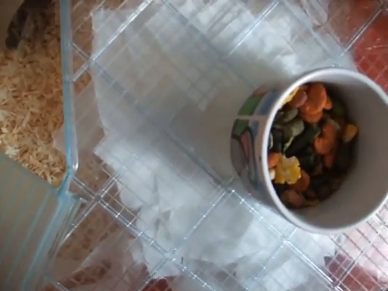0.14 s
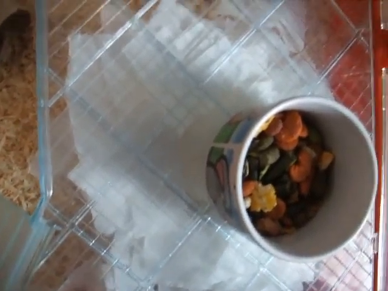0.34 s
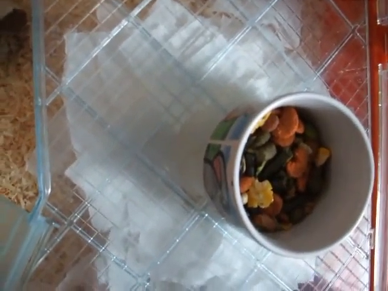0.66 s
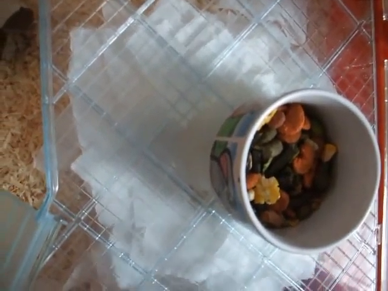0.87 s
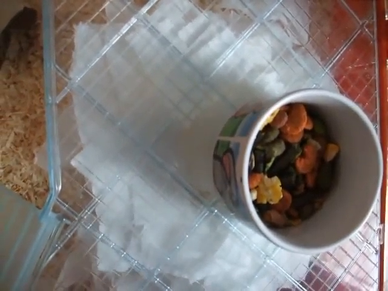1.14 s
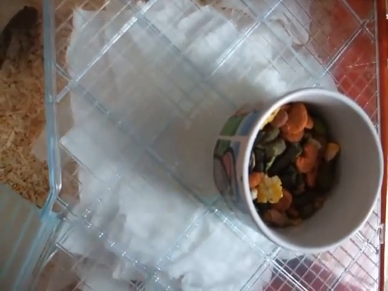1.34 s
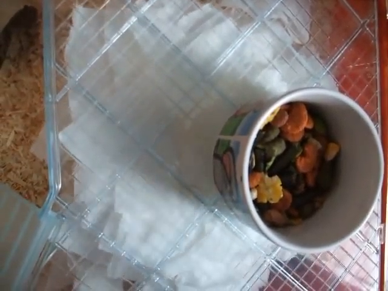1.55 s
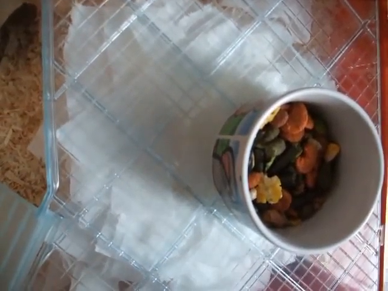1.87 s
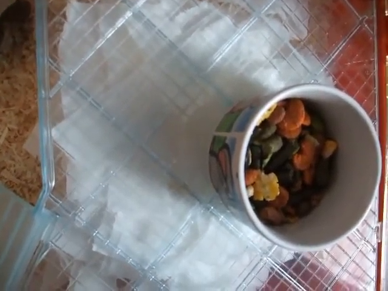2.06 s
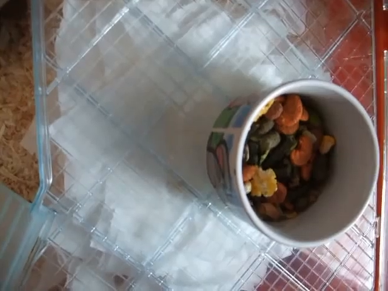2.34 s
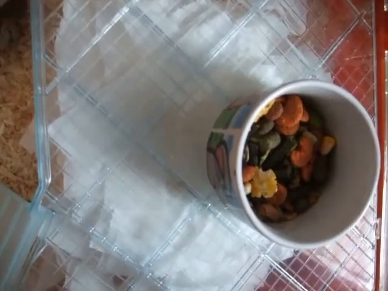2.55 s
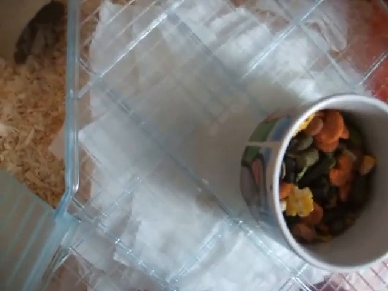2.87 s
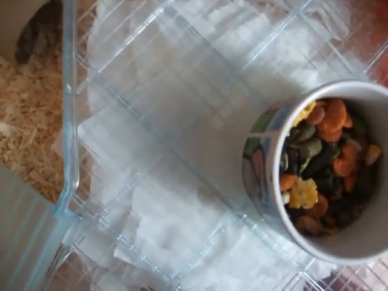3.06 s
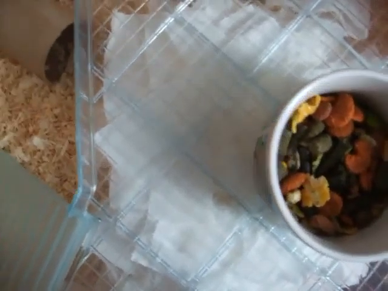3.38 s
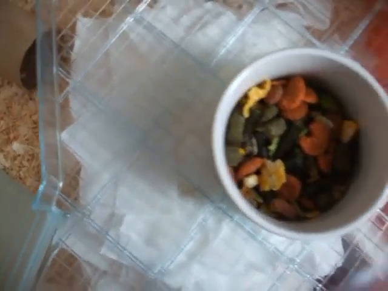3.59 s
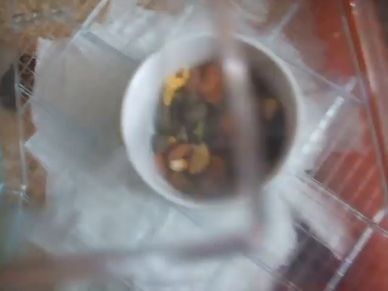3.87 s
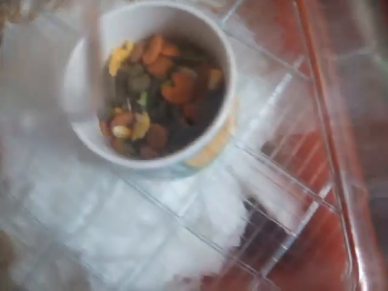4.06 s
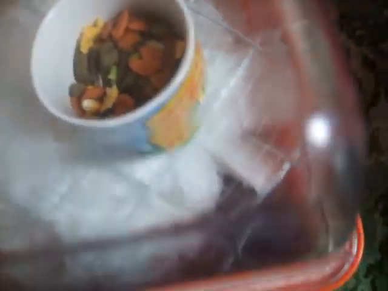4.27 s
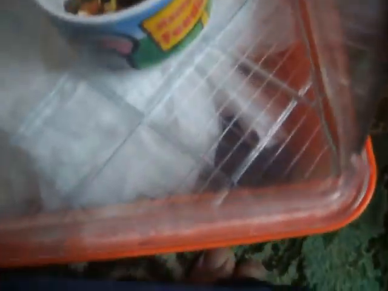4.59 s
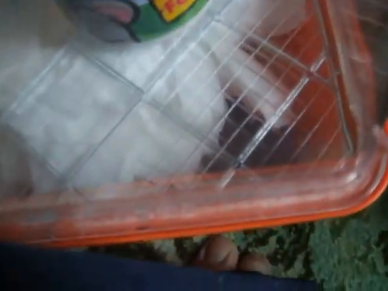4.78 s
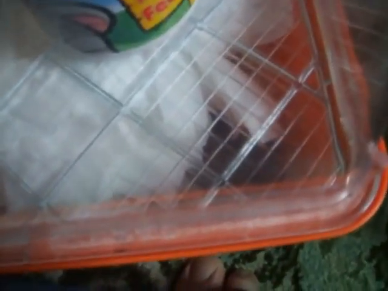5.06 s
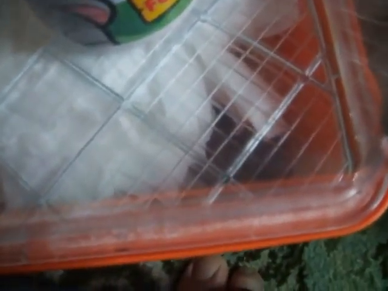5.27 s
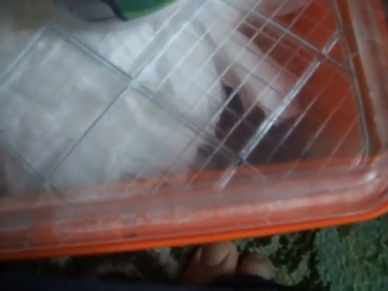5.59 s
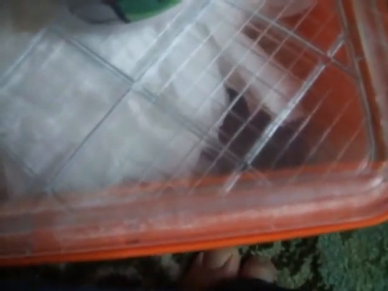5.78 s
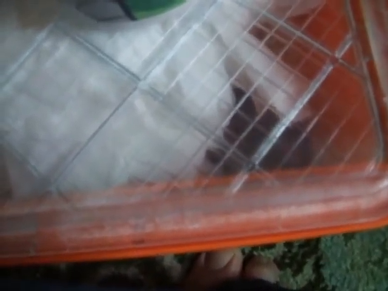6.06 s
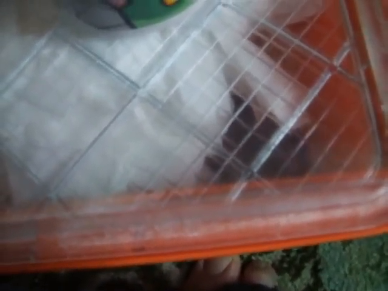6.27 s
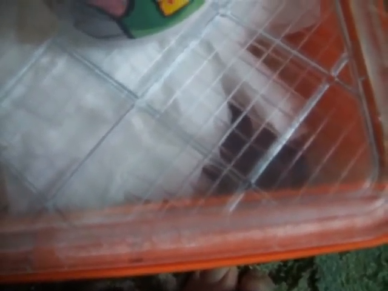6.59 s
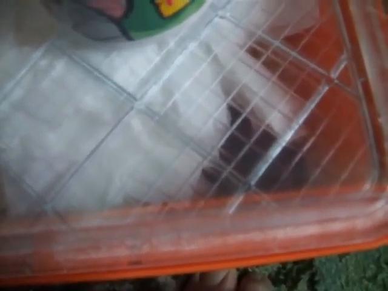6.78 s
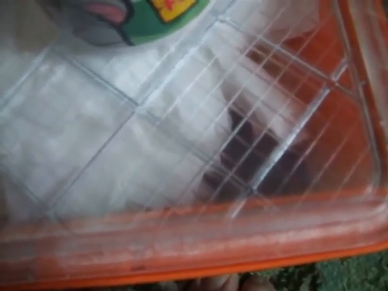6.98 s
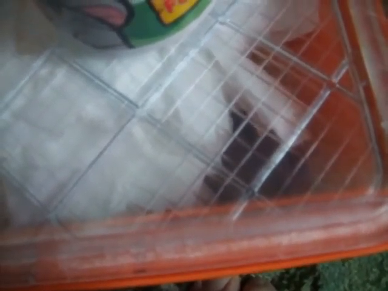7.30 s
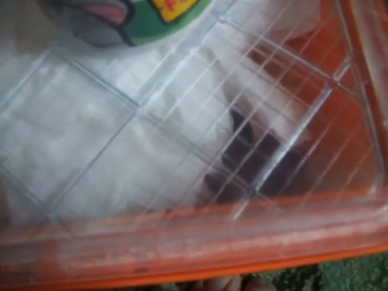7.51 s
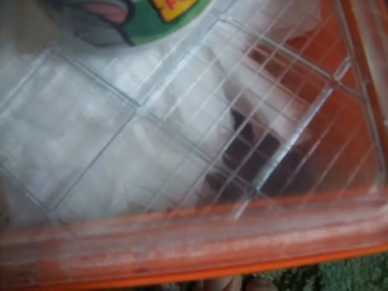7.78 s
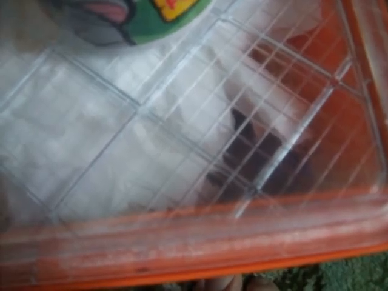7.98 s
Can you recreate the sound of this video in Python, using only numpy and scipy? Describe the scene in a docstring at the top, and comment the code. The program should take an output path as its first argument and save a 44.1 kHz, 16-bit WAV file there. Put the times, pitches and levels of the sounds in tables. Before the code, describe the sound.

A quiet indoor scene heard very close and dry through a narrow-band handheld microphone. A steady soft hiss runs throughout, with a faint thin whine and airy bands fluttering around 1 kHz. Tiny grip shifts open it; a light scuff and clicky thump come near 1.1 s. A heavy blunt thump hits at 2.05 s, softer ones around 2.6 s, with a sharp click at 2.86 s. Juddering low fumbles run from 2.9 to 3.3 s, strongest near 3.23 s. From 3.55 to 4.5 s plastic knocks and clicks crowd together, with very hard, clipped snaps at 3.76 and 3.97 s. A small snap at 4.74 s leads into a short, uneven creak from 4.78 to 4.92 s. Light taps follow near 5.05 and 5.53 s, weak ticks around 6.2 s, then mostly hiss until a faint double tap near 7.9 s, ending around 8.1 s.

```python
"""A quiet room, where a hand-held camera moves over a plastic hamster cage.
A steady coloured-noise hiss lies under it all, with fluttering narrow noise bands wavering near 1 kHz.
The grip slips in dull thumps, made of smooth pushes; contacts click by ringing the plastic's modes.
The plastic is scuffed (grainy noise), snaps (cracks of a few cycles) and creaks once (a panel sticks and slips).
A voice-band recorder ducks after loud hits and clips the hardest ones."""
import sys
import numpy as np
from scipy import signal
from scipy.fft import rfft, irfft
from scipy.io import wavfile
from scipy.ndimage import uniform_filter1d

SR = 44100
rng = np.random.default_rng(int(sys.argv[2]) if len(sys.argv) > 2 else 0)


def digitize_waveform(pressure):
    """Quantize a signal to 16-bit integers and store it at the path in sys.argv[1].

    Rows of a 2-D input are taken as channels; values are limited to [-1, 1].
    """
    field = np.atleast_2d(pressure).T
    bounded = np.clip(field, -1, 1)
    quanta = np.round(bounded * 32767).astype(np.int16)
    wavfile.write(sys.argv[1], SR, quanta)


N = 358974  # samples, about 8.14 s
TIME = np.arange(N) / SR
FREQS = np.fft.rfftfreq(N, 1 / SR)


def amp(db):
    """Decibels to gain."""
    return 10 ** (np.asarray(db) / 20)


def unit(x):
    """Scales to rms 1."""
    return x / np.sqrt(np.mean(x ** 2) + 1e-20)


def peaked(x):
    """Scales to peak 1."""
    return x / abs(x).max()


def curve(rows):
    """Joins (s, value) rows by straight lines."""
    return np.interp(TIME, *np.transpose(rows))


def add(mix, s, sound):
    """Mixes a sound in at time s."""
    part = mix[max(round(s * SR), 0):][:len(sound)]
    part += sound[:len(part)]


def noise(gain):
    """Noise of rms 1 with the given gain at each frequency."""
    white = rng.standard_normal(N)
    return unit(irfft(rfft(white) * gain, N))


def coloured(points):
    """Noise of rms 1 with a (Hz, dB) spectrum, joined by lines over log frequency."""
    hz, db = np.transpose(points)
    return noise(amp(np.interp(np.log(FREQS + 1), np.log(hz), db)))


def band(hz, width):
    """Noise of rms 1 in one resonance, width in Hz between its -3 dB points."""
    return noise(1 / (1 + ((FREQS - hz) / (0.78 * width)) ** 2))


def low_pass(x, hz, size):
    """Steep linear-phase low-pass."""
    taps = signal.firwin(size, hz, window=("kaiser", 9), fs=SR)
    return signal.oaconvolve(x, taps, "same")


def bass_cut(x, hz=130):
    """The microphone's third-order bass roll-off."""
    return signal.sosfilt(signal.butter(3, hz, "high", fs=SR, output="sos"), x)


def ring(modes, tilt_db, smear_db):
    """One blow on a set of decaying modes, then a brief smear of reflections inside the cage; peak 1."""
    t = np.arange(SR // 10) / SR
    hz, db, t60 = np.transpose(modes)[:, :, None]
    phase = 2 * np.pi * rng.random(hz.shape)  # each contact point starts the modes differently
    octaves = np.log2(hz / hz[0])
    decay = amp(db + tilt_db * octaves - 60 * t / t60)
    blow = (decay * np.sin(2 * np.pi * hz * t + phase)).sum(0)
    blow *= 1 - np.exp(-t / 0.00009)  # soften the onset
    echoes = rng.standard_normal(len(t)) * t * np.exp(-t / 0.0024)
    echoes /= np.linalg.norm(echoes)
    blow = blow + amp(smear_db) * signal.fftconvolve(blow, echoes)[:len(t)]
    return peaked(bass_cut(blow))


# Colour of the hiss. Each row: frequency in Hz, relative level in dB per Hz.
HISS_COLOUR = [(20, -6.5), (35, -4), (75, 4.5), (130, -7), (330, -6.5), (700, -7.5), (1300, -10),
               (1600, -7), (1850, -13.5), (2900, -12.5), (4200, -12.5), (5400, -14.5), (6500, -21.5)]
# Narrow bands in the hiss. Each row: centre in Hz, width in Hz, level in dB over the bowl,
# level in dB at the cage's edge (rms, before the hiss level curve).
HISS_BANDS = [(551.3, 68, -54.5, -55.5), (3284, 130, -57, -66.5), (2400, 550, -60.5, -52.5),
              (3550, 160, -65, -58)]
# Faint thin whine. Each row: frequency in Hz, level in dB (rms, before the hiss level curve).
WHINE_TONES = [(2008, -63.5), (3908, -67), (4000, -69)]
# How the whole hiss rises and falls as the camera turns. Each row: time in seconds, gain in dB.
HISS_GAIN = [(0, -0.5), (.9, -0.5), (1.5, -2), (2, .5), (2.3, -2), (3.5, 2), (4, 1.5), (5, -1), (7, -0.5),
             (8.14, -2)]


def hiss(base_db=-46):
    """Coloured noise whose narrow bands shift in level as the camera swings round, and a thin whine."""
    out = amp(base_db) * coloured(HISS_COLOUR)
    swing = curve([(3.6, 0), (4.5, 1)])  # 0 over the bowl, 1 at the cage's edge
    for hz, width, bowl_db, edge_db in HISS_BANDS:
        out += amp(bowl_db + swing * (edge_db - bowl_db)) * band(hz, width)
    for hz, db in WHINE_TONES:
        out += amp(db) * band(hz, width=26)
    return out * amp(curve(HISS_GAIN))


# Partials of the wavering band. Each row: centre in Hz, width in Hz, relative level in dB.
WAVER_PARTIALS = [(739, 150, -15), (843, 87, -13), (975, 72, -4.5), (1040.4, 52, -6.5), (1091, 110, -7.5),
                  (1360, 110, -15.5)]
# Overall level of the wavering band, before throb and swells. Each row: time in seconds, level in dB.
WAVER_LEVEL = [(0, -45), (.7, -41.5), (1.35, -45), (2, -43), (2.58, -44), (2.74, -57.5), (2.82, -41),
               (3.2, -41), (3.28, -50), (3.45, -42.5), (5.2, -44.5), (6.5, -43.5), (8.14, -45)]
# Its strongest brief swells. Each row: middle in seconds, rise in dB.
WAVER_SWELLS = [(0.409, 12.5), (1.048, 8.5), (3.131, 8.5), (6.528, 8)]
SWELL_S = 0.013  # time from the top of a swell down to about a third of its rise in dB


def waver(flutter_db=4, flutter_hz=24, throb_db=2.5, throb_hz=13):
    """Narrow bands near 1 kHz throb together at random, flutter apart, and now and then swell."""
    out = np.zeros(N)
    for hz, width, db in WAVER_PARTIALS:
        flutter = np.clip(noise(FREQS < flutter_hz), -2, 1.5)
        out += amp(db) * unit(band(hz, width) * amp(flutter_db * flutter))
    throb = np.minimum(noise((FREQS > 2) & (FREQS < throb_hz)), 1)
    swells = sum(db * np.exp(-((TIME - s) / SWELL_S) ** 2) for s, db in WAVER_SWELLS)
    return out * amp(curve(WAVER_LEVEL) + throb_db * throb + swells)


# Judders, in which the grip sticks and slips several times in a row. Each row: middle of the first push
# in seconds, middle of the last push in seconds, number of slips, first peak in dB, last peak in dB,
# middle bandwidth in Hz.
GRIP_JUDDERS = [(.01, 0.095, 4, -31, -33.5, 420), (1.9977, 2.022, 3, -21.5, -24, 205),
                (2.68, 2.702, 3, -30, -26, 150), (2.9345, 2.967, 3, -23.5, -17, 290),
                (2.9807, 3.0192, 5, -15.5, -28, 260), (3.0482, 3.0693, 3, -17, -28, 270),
                (3.2351, 3.279, 4, -6, -22.5, 600), (3.334, 3.348, 2, -29, -22.5, 190),
                (3.612, 3.708, 4, -13, -22.5, 560), (3.7855, 3.8047, 3, -22, -19, 720),
                (3.914, 3.931, 2, -24, -18.5, 620), (4.124, 4.1354, 2, -20.5, -27, 680),
                (4.1855, 4.1995, 2, -25, -23.5, 600), (4.257, 4.272, 2, -22.5, -28, 600),
                (4.394, 4.405, 2, -24, -21, 596), (5.5778, 5.639, 2, -27, -40, 650)]


def judders(uneven_oct=.08):
    """Evenly paced slips that grow or fade, each a little longer or shorter: (middle s, peak dB, bandwidth Hz)."""
    rows = []
    for first_s, last_s, slips, first_db, last_db, hz in GRIP_JUDDERS:
        for share in np.linspace(0, 1, int(round(slips))):
            s = first_s + share * (last_s - first_s)
            db = first_db + share * (last_db - first_db)
            rows.append((s, db, hz * 2 ** (uneven_oct * rng.standard_normal())))
    return rows


def faint_shifts(per_s=2.3, middle_db=-43.5, spread_db=7.5, middle_hz=600):
    """Barely felt shifts of the hand at random moments: rows of (middle s, peak dB, bandwidth Hz)."""
    draws = rng.random((80, 4))
    keep_chance = per_s * N / SR / len(draws)
    rows = []
    for chance, when, size, shortness in draws:
        if chance < keep_chance:
            db = middle_db + spread_db * (2 * size - 1)
            hz = middle_hz * 2 ** (2 * shortness - 1)  # up to an octave either way
            rows.append((when * N / SR, db, hz))
    return rows


# Single dull thumps of handling. Each row: middle of the push in seconds, peak in dB before the recorder,
# bandwidth in Hz (higher is a shorter push).
GRIP_THUMPS = [(0.3308, -34.5, 460), (1.171, -17, 278), (1.514, -34.5, 600), (1.837, -28, 620),
               (2.0522, 0.5, 660), (2.06, -9.5, 330), (2.4412, -30.5, 127), (2.6168, -18.5, 130),
               (2.6336, -8, 420), (2.86, -28.5, 500), (3.156, -27, 450), (3.2237, -3, 480),
               (3.298, -8.5, 650), (3.3084, -12, 470), (3.3253, -12, 550), (3.4445, -25.5, 132),
               (3.5548, -26.5, 130), (3.588, -16.5, 574), (3.7256, -20, 440), (3.7398, -14, 650),
               (3.7514, -21, 460), (4.0528, -31, 640), (4.4693, -28.5, 550), (5.0573, -10, 1150),
               (5.5342, -10, 1240), (6.1248, -34.5, 856), (7.6153, -36, 890), (7.9724, -26, 1000)]
# What the plastic rings with, also under the clicks. Each row: frequency in Hz,
# level in dB before the brightness tilt, t60 in seconds.
PLASTIC_MODES = [(229, -16, 0.039), (427, -11, .028), (760, -6.5, 0.02), (985, 1.5, 0.015),
                 (1220, -12, 0.0067), (1670, 4.5, 0.0088), (2237, -21, 0.00088), (2480, -16.5, 0.0014),
                 (2960, 3.5, 0.0056), (3633, 0, 0.0076), (4360, -9, 0.0029), (5100, -4, 0.0054),
                 (5545, -17, 0.0069)]


def thumps(ring_db=-36, body_hz=880):
    """Each grip slip is a smooth push, muffled by the camera body and swung by the bass cut; plastic rings faintly."""
    out, lead = np.zeros(N), SR // 200
    t = np.arange(-lead, SR // 25) / SR
    body = signal.butter(4, body_hz, fs=SR, output="sos")
    for s, db, hz in GRIP_THUMPS + judders() + faint_shifts():
        push = 1 / np.cosh(np.minimum(5.5 * hz * t, 50))  # the limit avoids overflow
        swing = peaked(bass_cut(signal.sosfilt(body, push)))
        add(out, s - lead / SR, -amp(db) * swing)
        add(out, s, amp(db + ring_db) * ring(PLASTIC_MODES, tilt_db=1.5, smear_db=-28.5))
    return out


# Clicks on the plastic. Each row: start in seconds, peak in dB before the recorder,
# brightness in dB per octave.
PLASTIC_CLICKS = [(0.927, -24.5, 13), (1.1603, -16, 10), (2.0515, -21.5, -0.5), (2.86, -13.5, 3.5),
                  (2.895, -25, 13), (3.570, -26, 13), (3.6136, -17.5, -6), (3.714, -21.5, 13),
                  (3.7623, -12, -6.5), (3.765, -4, 5.5), (3.775, -9.5, -1.5), (3.9238, -16, -7.5),
                  (3.9735, -5.5, 3.5), (4.0213, -7, 0), (4.0788, -16, -2.5), (4.111, -11, -1),
                  (4.1497, -10, -1.5), (4.170, -12.5, -3.5), (4.2373, -15.5, -3), (4.4705, -15.5, -0.5),
                  (4.594, -23, 4), (4.7381, -17, 4.5), (4.903, -19.5, -3), (4.9735, -24.5, -1),
                  (5.006, -19.5, -5.5), (5.0348, -24.5, 4), (5.0577, -24, -8.5), (5.5339, -13.5, -9.5),
                  (6.178, -24, -4), (6.2184, -22, -0.5), (7.879, -23.5, -2), (7.972, -23, -6.5)]


def clicks():
    """Hard little contacts ring the plastic for a few milliseconds."""
    out = np.zeros(N)
    for s, db, tilt_db in PLASTIC_CLICKS:
        add(out, s, amp(db) * ring(PLASTIC_MODES, tilt_db, smear_db=-13.5))
    return out


# Short dry scuffs. Each row: middle in seconds, length in seconds, level in dB at the top of the swell.
DRY_SCUFFS = [(1.06, 0.063, -36.5), (1.155, 0.012, -38.5), (2.896, 0.038, -42), (3.732, 0.093, -40.5),
              (4.733, 0.019, -37), (4.962, .02, -42.5), (5.032, 0.011, -43.5), (5.201, 0.026, -39.5)]
# Colour of the friction noise. Each row: frequency in Hz, relative level in dB.
FRICTION_COLOUR = [(1200, -29), (2000, -10), (2600, -4), (3400, -3), (4300, -3), (5400, -15)]


def scuffs(grain_db=3):
    """Brief swells of friction noise, made grainy by a fast random level."""
    swells = np.zeros(N)
    for s, length, db in DRY_SCUFFS:
        add(swells, s - length / 2, amp(db) * signal.windows.tukey(int(length * SR), .7))
    grain = unit(uniform_filter1d(rng.standard_normal(N), size=90))
    return swells * unit(coloured(FRICTION_COLOUR) * amp(grain_db * grain))


# Sharp snaps of the plastic, which do not ring. Each row: middle of the crack in seconds, crack level in dB,
# crack frequency in Hz, crack length in seconds, level in dB of the air shoved at the microphone.
PLASTIC_SNAPS = [(3.7649, 5, 3896, 0.0002, -39), (3.9739, 5, 4310, 0.00029, 4.5),
                 (4.7393, -19, 3280, 0.00086, -48)]


def snaps(shove_length=0.00031):
    """A crack of a few cycles, and from its middle on a one-sided shove of air."""
    out, lead = np.zeros(N), SR // 500
    t = np.arange(SR // 50) / SR
    for s, db, hz, length, shove_db in PLASTIC_SNAPS:
        burst = np.exp(-((t - lead / SR) / length) ** 2)
        add(out, s - lead / SR, amp(db) * burst * np.sin(2 * np.pi * hz * t))
        add(out, s, amp(shove_db) * peaked(t * np.exp(-t / shove_length)))
    return out


# Slips of the one creak. Each row: start in seconds, peak in dB before the recorder.
CREAK_SLIPS = [(4.781, -13.5), (4.79, -26), (4.8074, -22), (4.82, -24), (4.84, -17), (4.856, -18.5),
               (4.915, -12.5)]
# What the creaking panel rings with. Each row: frequency in Hz, level in dB before the tilt, t60 in seconds.
PANEL_MODES = [(160, -4, 0.064), (230, 0, 0.06), (421, 1.5, 0.032), (576, -7, 0.064), (804, 1, 0.064),
               (1058, 1.5, 0.028), (1154, -0.5, 0.029), (1610, -5.5, 0.049), (1737, 3, 0.037),
               (2140, -2, 0.027), (2226, -3, 0.024), (3280, -10.5, 0.016)]
REBOUND_S, REBOUND_DB = 0.00301, -11  # every slip catches once more, a moment later and softer


def creak(chatter_db=-31, count=28):
    """A panel sticks and slips unevenly, ringing at each slip and rebound; tiny slips chatter on just after."""
    out = np.zeros(N)
    for s, db in CREAK_SLIPS:
        for delay, drop_db in ((0, 0), (REBOUND_S, REBOUND_DB)):
            add(out, s + delay, amp(db + drop_db) * ring(PANEL_MODES, tilt_db=-1.1, smear_db=-7.5))
    for k, delay in enumerate(rng.uniform(0.0022, 0.026, count)):
        s = CREAK_SLIPS[k % len(CREAK_SLIPS)][0] + delay
        add(out, s, amp(chatter_db) * ring(PANEL_MODES, tilt_db=-4, smear_db=-7))
    return out


def scene():
    """Everything is close to the microphone, so no room is heard."""
    return (hiss() + waver() + thumps() + clicks() + scuffs() + snaps() + creak())[None]


def gain_control(x, threshold_db=-17, depth=0.54, recovery_db_per_s=250):
    """Too slow to catch a hit itself, it ducks the moment after each loud one."""
    power = signal.lfilter(np.ones(88) / 88, 1, x ** 2)  # over 2 ms
    fall = TIME * recovery_db_per_s
    # adding the fall before the running maximum makes the held level sink steadily
    held_db = np.maximum.accumulate(10 * np.log10(power + 1e-12) + fall) - fall
    over_db = np.maximum(held_db - threshold_db, 0)
    cut_db = depth * signal.lfilter(np.ones(220) / 220, 1, over_db)  # eased over 5 ms
    return x / amp(cut_db)


def record(dry, voice_band_hz=5560, edge_hz=15000):
    """A voice-band input with gain control, then hard clipping that splashes the loudest hits into the treble."""
    voice = low_pass(dry[0], voice_band_hz, size=301)
    clipped = np.clip(gain_control(voice), -1, 1)
    return low_pass(clipped, edge_hz, size=201)[None]


dry = scene()
out = record(dry)
digitize_waveform(out)
```